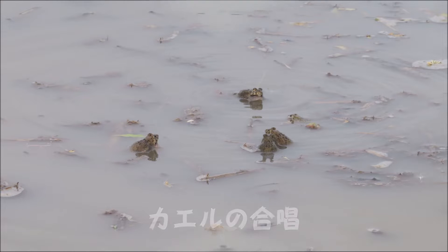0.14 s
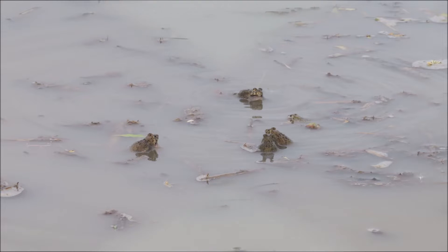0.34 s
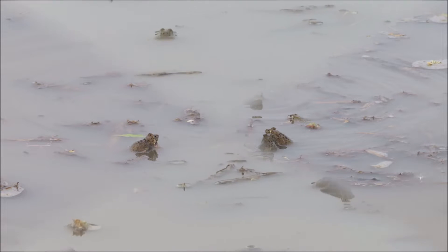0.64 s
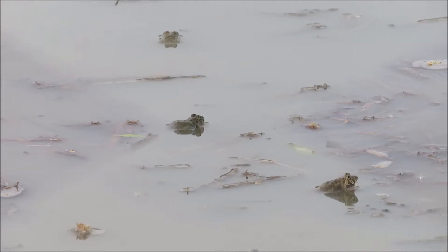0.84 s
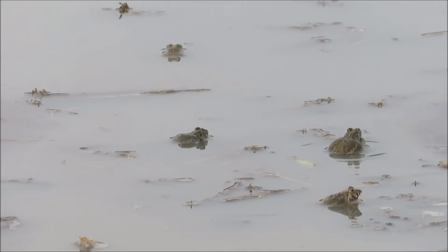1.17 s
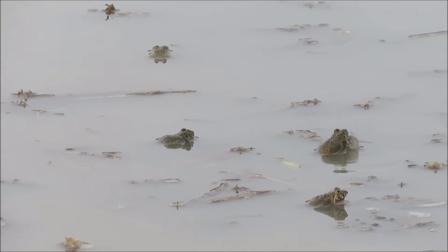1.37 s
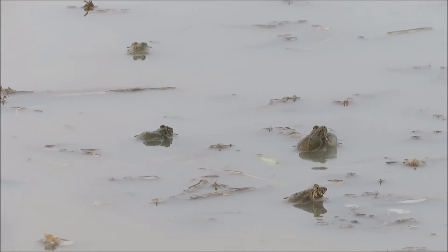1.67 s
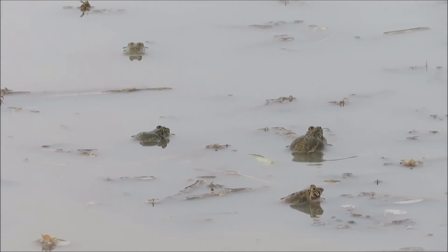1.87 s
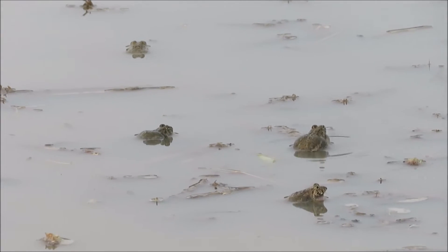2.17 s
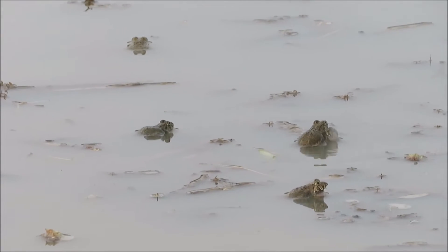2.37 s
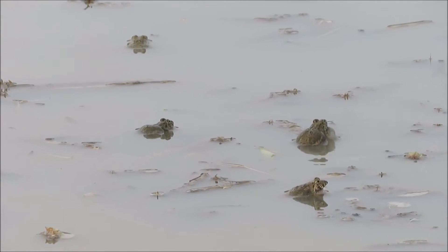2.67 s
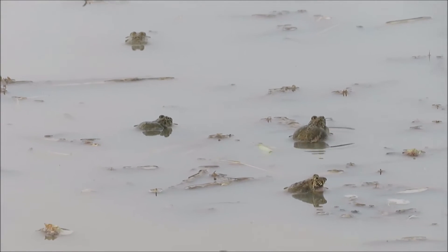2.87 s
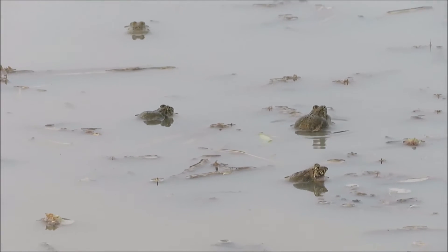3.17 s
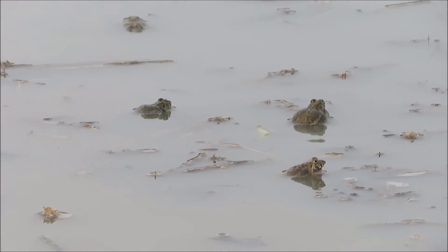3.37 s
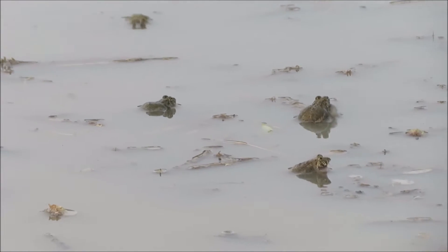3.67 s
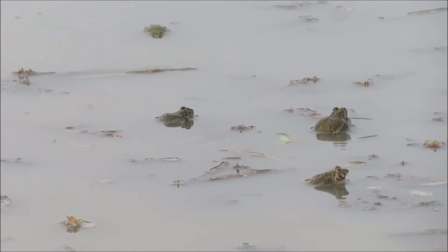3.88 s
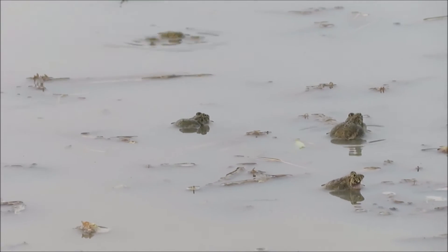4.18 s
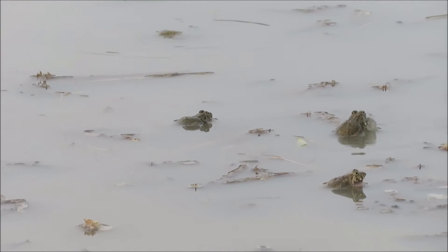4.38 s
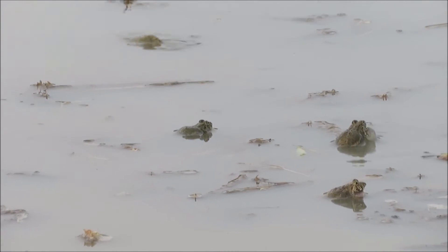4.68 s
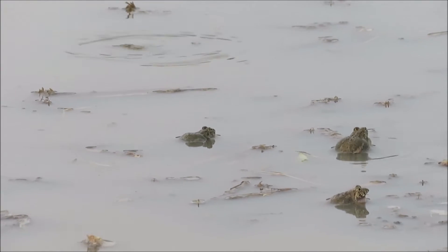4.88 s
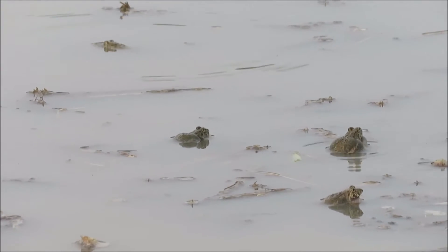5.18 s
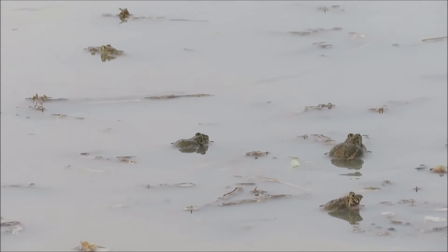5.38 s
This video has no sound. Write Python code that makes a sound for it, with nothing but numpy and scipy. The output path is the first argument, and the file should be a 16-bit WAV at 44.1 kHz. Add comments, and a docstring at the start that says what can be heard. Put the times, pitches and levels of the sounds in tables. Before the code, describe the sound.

A dense chorus of frogs starts at once and continues unbroken for about five and a half seconds in a flooded rice field. Several close frogs overlap short, raspy, rattling croaks, each about a tenth of a second or less, some deeper and some higher, many per second. Behind them, farther frogs repeat their calls and blur into a hissing wash that swells and eases with the near ones. A few soft, brief peeps that fall in pitch slip through during the first three seconds. Light wind rumbles on the microphone, with small low thumps mostly between 0.8 and 2.6 seconds and another gust just after 3 seconds. A distant motor hums faintly and steadily underneath. The near croaks crowd a little closer together from around 3.5 seconds. One sharp tick sounds slightly to the left at about 5.4 seconds while the frogs keep calling.

```python
"""A dense chorus of frogs croaks over a flooded rice field, heard on a two-port microphone.
Each croak is a short train of pulses that ring the vocal sac. The nearest croaks and a few peeps
stand out of many farther frogs and a blurred wash from across the water. Light wind buffets
the ports, a distant motor hums, and one sharp tick falls near the end."""
import sys
import numpy as np
from scipy import signal
from scipy.fft import rfft, irfft, next_fast_len
from scipy.io import wavfile
from scipy.ndimage import uniform_filter1d

SR = 44100
rng = np.random.default_rng(int(sys.argv[2]) if len(sys.argv) > 2 else 0)


def dump_mix(stems):
    """Bounce the given channels to the path in sys.argv[1] as a 16-bit WAV at rate SR."""
    frames = np.atleast_2d(stems).T  # one column per channel
    limited = np.clip(frames, -1, 1)  # hard clip at full scale
    pcm = np.round(limited * 32767).astype(np.int16)
    wavfile.write(sys.argv[1], SR, pcm)


N = 243873


def amp(db):
    return 10 ** (np.asarray(db) / 20)


def unit_rms(x):
    return x / np.sqrt(np.mean(x ** 2) + 1e-20)


def curve_at(points, hz):
    f, value = np.transpose(points)
    return np.interp(np.log(hz + 1), np.log(f + 1), value)


def add(mix, s, sound):
    start = round(s * SR)
    part = mix[..., max(start, 0):max(start + sound.shape[-1], 0)]
    part += sound[..., max(-start, 0):][..., :part.shape[-1]]


def wander(samples):
    return unit_rms(uniform_filter1d(uniform_filter1d(rng.standard_normal(N), samples), samples))


def port_noise(spectrum, likeness, lead, size, patchy_db):
    """Patchy noise at both ports; likeness is (frequency [Hz], correlation), lead the left's phase lead."""
    frames, hz = 4 * N // size + 5, np.fft.rfftfreq(size, 1 / SR)
    a, b, c, d, patches = rng.standard_normal((frames, len(hz), 5)).T
    patches = unit_rms(uniform_filter1d(uniform_filter1d(patches, 8, axis=0), 12, axis=1))
    shared = np.clip(curve_at(likeness, hz), -1, 1)[:, None]
    left = a + 1j * b
    right = shared * left + np.sqrt(1 - shared ** 2) * (c + 1j * d)
    right *= np.exp(-1j * curve_at(lead, hz))[:, None]
    spectra = np.array([left, right]) * amp(curve_at(spectrum, hz)[:, None] + patchy_db * patches)
    return unit_rms(signal.istft(spectra, nperseg=size, noverlap=3 * size // 4)[1][:, :N])


def motor_hum():
    """A distant motor: three low tones that waver slightly together."""
    # motor orders (frequency [Hz], rms level [dB])
    orders = [(64.7, -35), (129.5, -41.5), (454, -66)]
    wavering_s = np.cumsum(1 + .00503 * wander(9000)) / SR
    return sum(np.sqrt(2) * amp(db) * np.sin(2 * np.pi * (hz * wavering_s + rng.random()))
               for hz, db in orders)


def frog_wash():
    """Countless frogs across the water blur into hiss."""
    # colour of the wash (frequency [Hz], relative density [dB])
    spectrum = [(300, -47), (420, -33), (800, -35), (950, -33.5), (1180, -6), (1340, -2.5), (1520, -9),
                (2020, -22), (2450, -11), (2950, -5.5), (3430, -24), (4120, -23.5), (5100, -36),
                (7300, -44.5), (8300, -41.5), (10000, -56), (15000, -70.5)]
    # likeness of the ports (frequency [Hz], correlation [0-1])
    likeness = [(500, 0.47), (1200, 1), (2200, 0.96), (4000, 0.52), (8000, 0.19)]
    return amp(-24.5) * port_noise(spectrum, likeness, [(100, .083), (9000, .29)], size=512, patchy_db=3)


def wind():
    """Wind on the microphone: a rumble shared by both ports; buffeting and thumps arrive out of step."""
    # wind strength (time [s], rumble level [dB])
    gusts = [(0.0, -38), (0.68, -37.5), (0.769, -25), (1.4, -35.5), (1.45, -27), (1.99, -26.5),
             (3.06, -36.5), (3.11, -19.5), (4.1, -35), (5.53, -31.5)]
    # colours of rumble and buffeting (frequency [Hz], relative density [dB])
    rumble_spectrum = [(15, -22.5), (30, 4.5), (60, 13.5), (100, 1.5), (150, -6.5), (300, -42),
                       (2000, -120)]
    buffet_spectrum = [(40, -18.5), (90, 6.5), (150, 1), (250, -8), (400, -18), (600, -37), (3000, -120)]
    # buffeting reaches the left port first (frequency [Hz], phase lead [rad])
    port_lead = [(60, 0.02), (130, 1.1), (220, 1.14), (330, 1.8)]
    # short bursts of strong turbulence (time [s], rms level [dB])
    thumps = [(0.762, -21.5), (0.791, -21), (0.92, -28.5), (0.973, -21), (1.218, -28), (1.428, -22.5),
              (1.523, -25.5), (1.693, -29), (1.825, -19), (1.873, -20.5), (1.955, -28), (2.157, -20),
              (2.197, -19.5), (2.296, -26), (2.41, -19), (2.616, -26), (3.127, -30), (3.171, -31),
              (3.299, -26), (3.422, -26), (4.299, -30), (4.958, -30.5)]
    rumble = port_noise(rumble_spectrum, [(50, 1), (120, .85)], [(50, 0), (150, .16)],
                        size=4096, patchy_db=-4.5)
    likeness = [(30, .91), (80, .92), (160, .7), (280, .97), (450, .55)]
    buffet = port_noise(buffet_spectrum, likeness, port_lead, size=2048, patchy_db=-2.5)
    rumble_db = np.interp(np.arange(N) / SR, *np.transpose(gusts))
    buffet_db = -35 + .41 * (rumble_db + 30)
    lumps = unit_rms(amp(3.5 * wander(600)))
    out = amp(rumble_db) * rumble + amp(buffet_db) * lumps * buffet
    turbulence = buffet + .35 * rumble
    window = np.hanning(round(.047 * SR))
    for s, db in thumps:
        burst = turbulence[:, round(s * SR):][:, :len(window)] * window
        add(out, s - .01, amp(db) * unit_rms(burst))
    return out * amp([[-.6], [.6]])


def tick():
    """One sharp broadband tick, a little to the left."""
    at_s, decay_s = 5.4208, .00028
    out = np.zeros((2, N))
    add(out, at_s, amp([[-9.5], [-12.5]]) * np.exp(-np.arange(120) / SR / decay_s))
    return out


def water_scatter(sound):
    """Open water scatters a short tail: sparse echoes of random sign."""
    rt60_s = .16
    taps = np.zeros((2, 6000))
    delays = np.arange(100, 5980, 20) + rng.integers(0, 20, (2, 294))
    np.put_along_axis(taps, delays, rng.choice([-1., 1.], delays.shape), 1)
    taps[1] = 1.1 * taps[0] + .5 * taps[1]
    taps *= amp(-60 * np.arange(6000) / SR / rt60_s)
    return signal.fftconvolve(sound, taps / np.linalg.norm(taps[0]), axes=1)[:, :N]


def croak(length_s, hz, db, pan_db, wobble):
    """Pulses swell and cut off, each ringing the vocal sac afresh; returns sound and pulse envelope."""
    pulse_hz = 83.5
    count = max(round(length_s * pulse_hz), 1) + 1
    index = np.arange(count)[:, None]
    jitter, strength, detune, offset = wobble[:count].T[:, :, None]
    if hz < 2000:  # deep rings swell more slowly and last longer
        rise_s, fall_s, side_ratio, side_db, weight = .0034, .0019, 1.28, -11, 1
    elif hz < 3000:
        rise_s, fall_s, side_ratio, side_db, weight = .0017, .0013, .6, -30, 1.2
    else:
        rise_s, fall_s, side_ratio, side_db, weight = .0013, .0009, .6, -15, 1.2
    peaks_s = np.linspace(0, length_s, count)[:, None] + .0002 * jitter
    since = np.arange(-.015, length_s + .03, 1 / SR) - peaks_s
    swell = np.sin(np.pi * (index + .5) / count) ** .25 * amp(1.4 * strength)
    pulses = swell * np.exp(-.5 * (since / np.where(since < 0, rise_s, fall_s)) ** 2)
    port_db = pan_db * np.array([[.5], [-.5]])
    lead_s = 12e-6 * port_db[:, None]  # the nearer port hears it first
    arch = .03 * (np.sin(np.pi * (index + .27) / count) - .7)  # the fuller sac rings higher mid-croak
    phase = 2 * np.pi * hz * (1 + arch + .007 * detune) * (since + lead_s) + .3 * offset
    # a weaker, shorter ring between the deep and high bands
    side_ring = amp(side_db) * np.minimum(pulses, 1) * np.cos(side_ratio * phase)
    rings = pulses * (np.cos(phase) + side_ring)
    return amp(db + port_db) * rings.sum(1), amp(db) * pulses.sum(0) * weight


def far_frogs(per_kind=5):
    """Farther out in the field, each frog keeps its own voice and croaks about three times a second."""
    # kinds of frog (ring [Hz], spread [Hz], level [dB], left over right [dB])
    kinds = [(1293, 69.4, -20.5, 1.5), (2593, 190, -22, -0.5), (2963, 150, -18.5, 4)]
    out = np.zeros((2, N))
    for hz, spread, db, pan_db in kinds:
        for voice, side, pace, start in rng.standard_normal((per_kind, 4)):
            ring_hz = min(hz + spread * np.clip(voice, -1.5, 1.5), 2960)
            period_s = .36 * (1 + .06 * pace)
            for s in np.arange((start * 7 % 1 - 1) * period_s, N / SR, period_s):
                late, strong = rng.standard_normal(2)
                sound, _ = croak(.085 + .004 * late, ring_hz, db + 1.9 * strong, pan_db + .73 * side,
                                 wobble=rng.standard_normal((16, 4)))
                add(out, s + .02 * late, sound)
    return out


def peeps(length_s=.039, slide_hz_per_s=-4800):
    """Short soft whistles that slide down in pitch."""
    # whistles (time [s], starting pitch [Hz], peak level [dB])
    calls = [(.065, 2420, -25), (.315, 2350, -28), (.55, 2450, -24), (.852, 2400, -23), (1.3, 2380, -24),
             (1.757, 2420, -22), (2.825, 2540, -21)]
    out, t = np.zeros(N), np.arange(0, length_s, 1 / SR)
    envelope = np.sqrt(np.hanning(len(t)))
    for s, start_hz, db in calls:
        hz = start_hz + slide_hz_per_s * t
        add(out, s, amp(db) * envelope * np.sin(2 * np.pi * np.cumsum(hz) / SR))
    return out


def rasp(breath):
    """Each pulse of a near frog lets through a puff of hiss; the right port hears it a sample later."""
    # rasp with weak upper rings (frequency [Hz], relative density [dB])
    spectrum = [(1000, -39.5), (1700, -6), (2100, -2), (3400, 5), (4100, 0), (4600, -12), (5100, -12.5),
                (5600, -8.5), (7300, -35.5), (8250, -14), (8700, -20), (9300, -23.5), (10000, -42),
                (15000, -43)]
    common, separate = rng.standard_normal((N, 2)).T
    hiss = np.array([1.45 * common, 1.05 * np.roll(common, 1) + .67 * separate])
    puffs = uniform_filter1d(breath, 120) * hiss
    size = next_fast_len(N)
    colour = amp(curve_at(spectrum, np.fft.rfftfreq(size, 1 / SR)))
    return amp(-40.5) * unit_rms(irfft(rfft(puffs, size) * colour, size)[:, :N])


def near_frogs():
    """Five frogs close to the microphone, two rings to a pulse; returns sound and pulse envelope."""
    # croaks (first pulse [s], last pulse [s], frog, level [dB])
    croaks = [(0.015, 0.064, "alto", -11), (0.062, 0.175, "low", -19), (0.082, 0.149, "bass", -11),
              (0.197, 0.31, "high", -11), (0.241, 0.343, "alto", -11.5), (0.335, 0.402, "low", -13),
              (0.445, 0.541, "bass", -10), (0.498, 0.586, "low", -23.5), (0.632, 0.695, "mid", -13),
              (0.644, 0.708, "alto", -14.5), (0.733, 0.843, "bass", -12), (0.9, 0.955, "low", -20),
              (0.909, 0.971, "high", -10), (1.008, 1.079, "mid", -19), (1.016, 1.072, "alto", -15),
              (1.117, 1.215, "bass", -9.5), (1.137, 1.242, "mid", -23), (1.296, 1.381, "low", -14),
              (1.313, 1.363, "alto", -12), (1.414, 1.479, "low", -17.5), (1.474, 1.533, "low", -20),
              (1.491, 1.563, "bass", -10), (1.568, 1.612, "alto", -15), (1.622, 1.7, "mid", -15),
              (1.755, 1.816, "high", -11), (1.808, 1.922, "bass", -16), (1.849, 1.895, "mid", -15.5),
              (1.984, 2.048, "mid", -18), (2.082, 2.151, "high", -12.5), (2.189, 2.294, "bass", -11.5),
              (2.326, 2.4, "mid", -17.5), (2.447, 2.504, "low", -16.5), (2.543, 2.609, "bass", -11.5),
              (2.558, 2.606, "mid", -15), (2.569, 2.621, "high", -10.5), (2.667, 2.747, "mid", -17.5),
              (2.809, 2.918, "low", -18), (2.91, 2.972, "mid", -17), (2.921, 2.97, "alto", -11.5),
              (3.023, 3.084, "low", -13), (3.138, 3.194, "low", -13.5), (3.216, 3.326, "bass", -15.5),
              (3.243, 3.295, "alto", -12.5), (3.284, 3.382, "low", -14.5), (3.398, 3.458, "alto", -16),
              (3.416, 3.463, "mid", -14), (3.517, 3.627, "low", -13), (3.537, 3.621, "alto", -14.5),
              (3.666, 3.739, "bass", -9), (3.694, 3.747, "mid", -13.5), (3.774, 3.85, "high", -9.5),
              (3.763, 3.832, "low", -15.5), (3.889, 3.95, "low", -12.5), (3.914, 3.964, "alto", -15),
              (3.997, 4.108, "bass", -12.5), (3.985, 4.081, "low", -16), (4.136, 4.211, "high", -10.5),
              (4.176, 4.259, "mid", -16), (4.188, 4.267, "alto", -18.5), (4.282, 4.36, "alto", -10),
              (4.303, 4.365, "mid", -13.5), (4.358, 4.469, "bass", -11), (4.417, 4.485, "mid", -20),
              (4.473, 4.572, "low", -16), (4.515, 4.619, "alto", -14.5), (4.521, 4.569, "high", -9),
              (4.659, 4.74, "low", -14), (4.684, 4.784, "bass", -14.5), (4.75, 4.847, "alto", -14.5),
              (4.767, 4.875, "mid", -18), (4.858, 4.952, "alto", -17.5), (4.901, 4.982, "low", -17.5),
              (5.014, 5.1, "mid", -12), (5.015, 5.126, "bass", -14), (5.133, 5.213, "low", -22),
              (5.228, 5.306, "high", -9), (5.32, 5.423, "mid", -18.5), (5.383, 5.45, "bass", -12.5),
              (5.435, 5.506, "mid", -14.5), (5.42, 5.512, "alto", -23)]
    # each frog's deep and high ring (frequency [Hz], relative level [dB], left over right [dB])
    voices = {"bass": [(1377, -1, 1.2), (2943, -7.5, 3)], "low": [(1304, -5, 1), (2520, -1, 0.4)],
              "mid": [(1300, -7.5, 0.9), (2560, 0, 4.5)], "alto": [(1330, -4.5, 0.2), (2983, -1, 3.5)],
              "high": [(1342, -14.5, 1), (3089, -1, 1.3)]}
    # rasp let through (frog, relative level [dB])
    raspiness = {"bass": -0.5, "low": -3.5, "mid": -2.5, "alto": -3, "high": -4.5}
    out, activity, breath = np.zeros((2, N)), np.zeros(N), np.zeros(N)
    for first, last, frog, db in croaks:
        start = first - .015
        wobble = rng.standard_normal((16, 4))  # both rings share each pulse's unevenness
        for hz, ring_db, pan_db in voices[frog]:
            sound, pulses = croak(last - first, hz, db + ring_db, pan_db, wobble)
            add(out, start, sound)
            add(activity, start, pulses)
            add(breath, start, amp(raspiness[frog]) * pulses)
    return out + rasp(breath), activity


def scene():
    """The whole chorus swells and eases with the nearest frogs, over wind and motor."""
    near, activity = near_frogs()
    together = unit_rms(uniform_filter1d(activity + .033, 1300))
    frogs = near + together ** .5 * far_frogs() + peeps()
    chorus = frogs + amp(-13.5) * water_scatter(frogs) + together ** .23 * frog_wash()
    return chorus + wind() + motor_hum() + tick()


def record(dry):
    """The sound sets in abruptly after an instant of silence, its peaks rounded and top treble cut."""
    opened = dry * np.clip((np.arange(N) / SR - .0112) / .001, 0, 1)
    rounded = 1.3 * np.tanh(opened / 1.3)
    lowpass = signal.firwin(511, cutoff=15600, window=("kaiser", 9), fs=SR)
    return signal.oaconvolve(rounded, lowpass[None], "same")


dry = scene()
out = record(dry)
dump_mix(out)
```